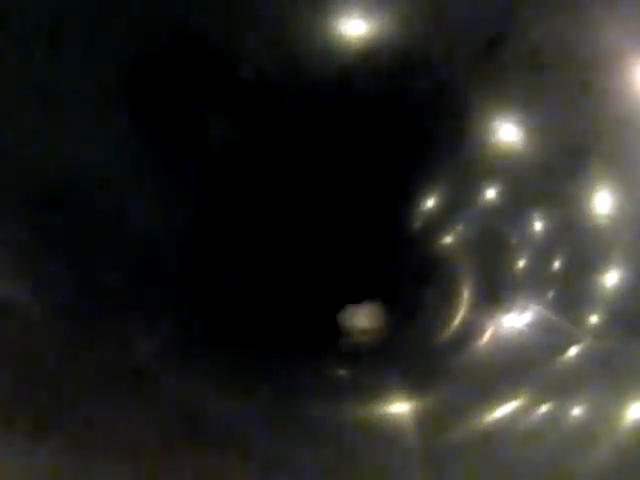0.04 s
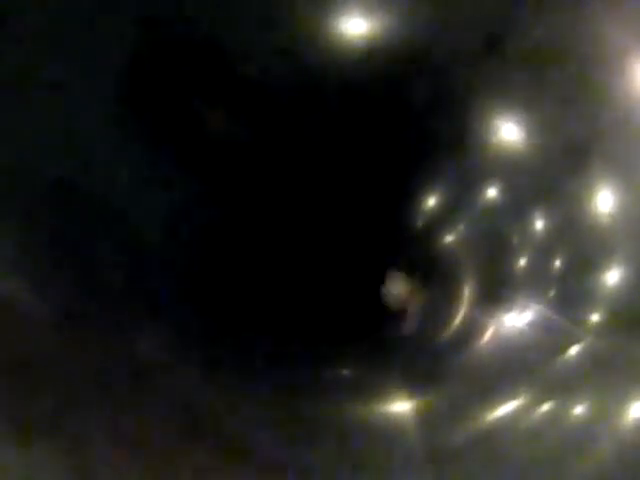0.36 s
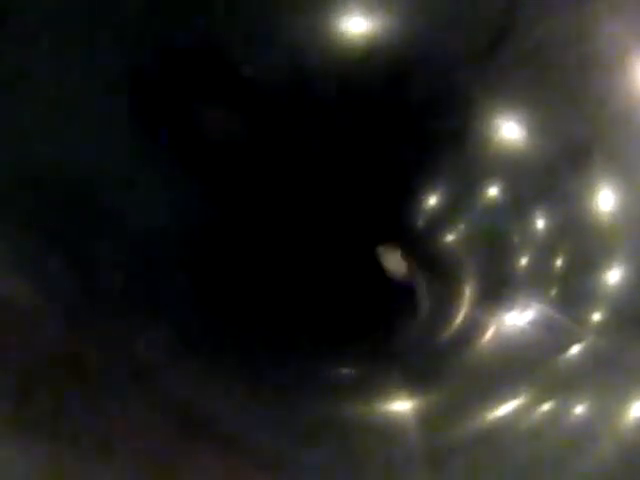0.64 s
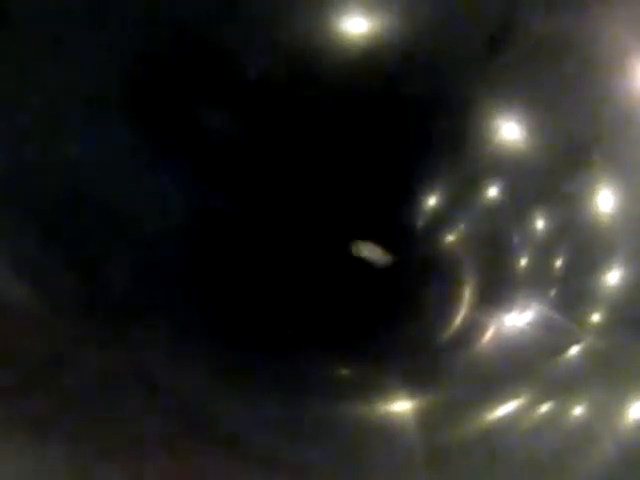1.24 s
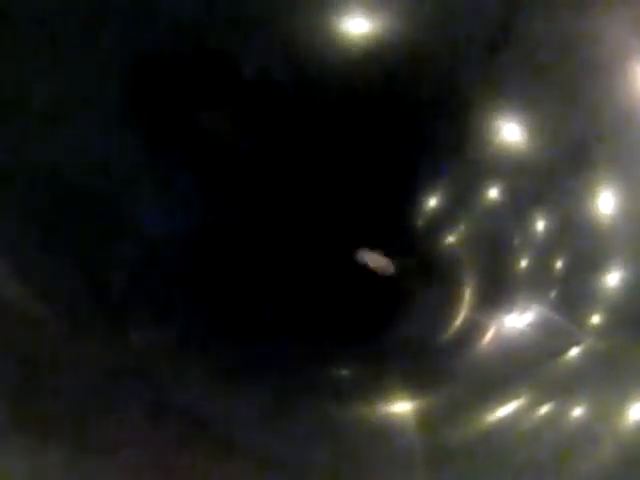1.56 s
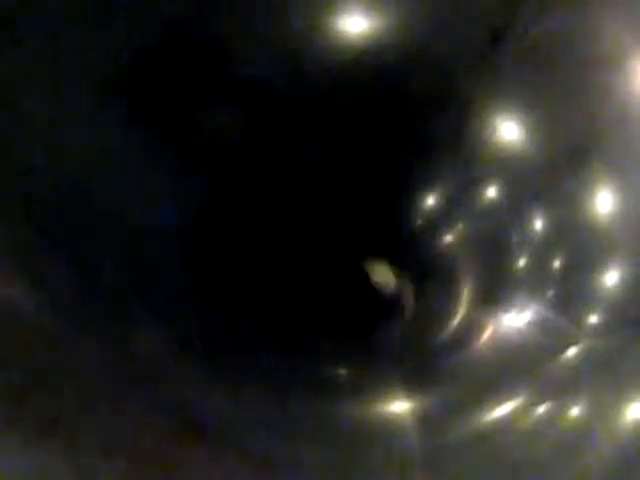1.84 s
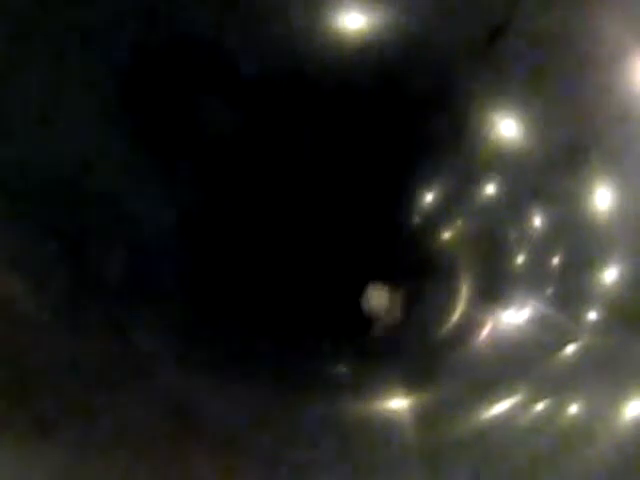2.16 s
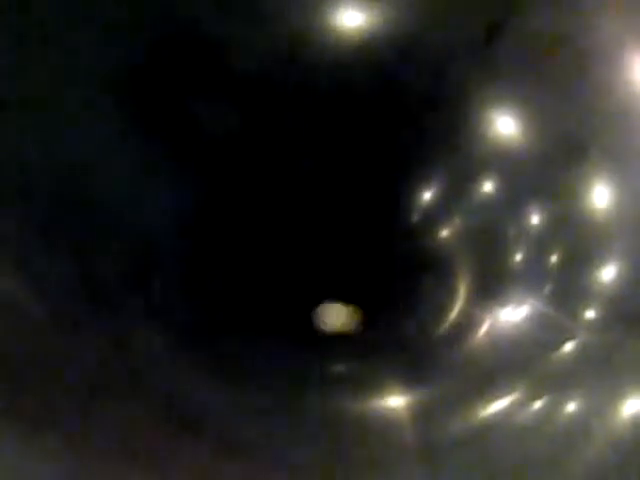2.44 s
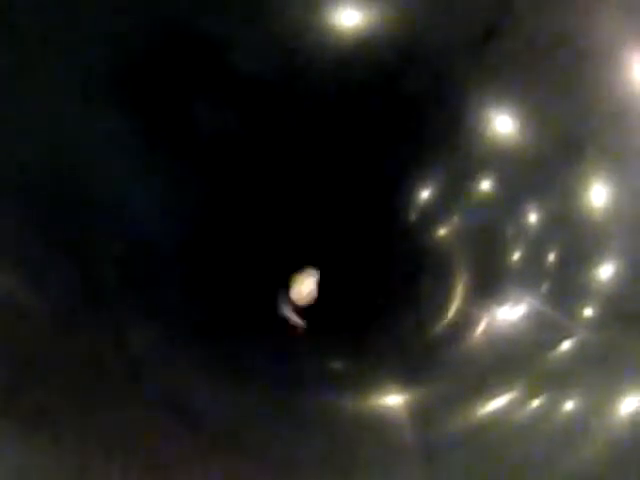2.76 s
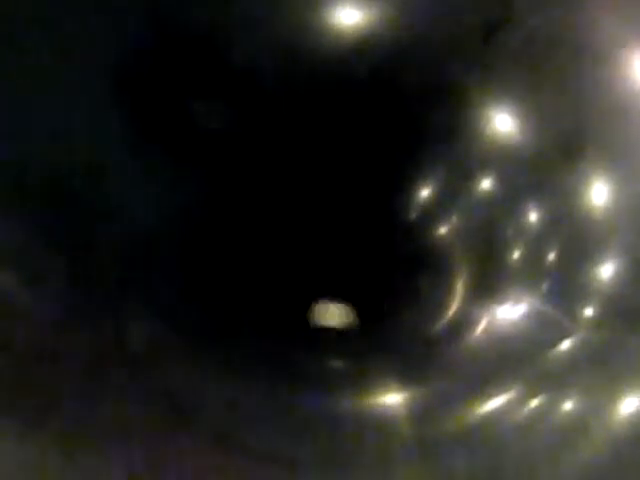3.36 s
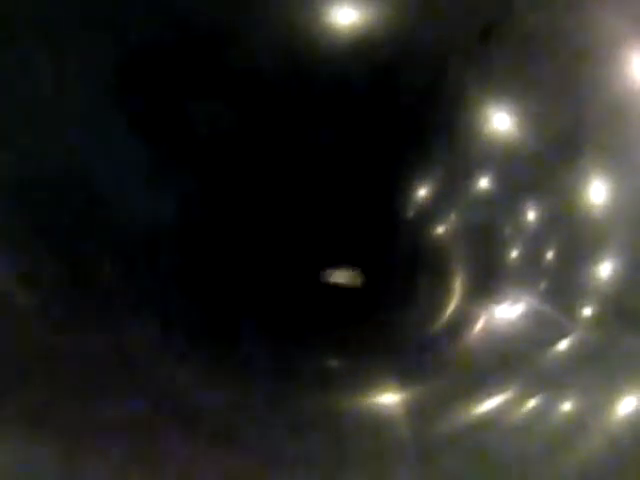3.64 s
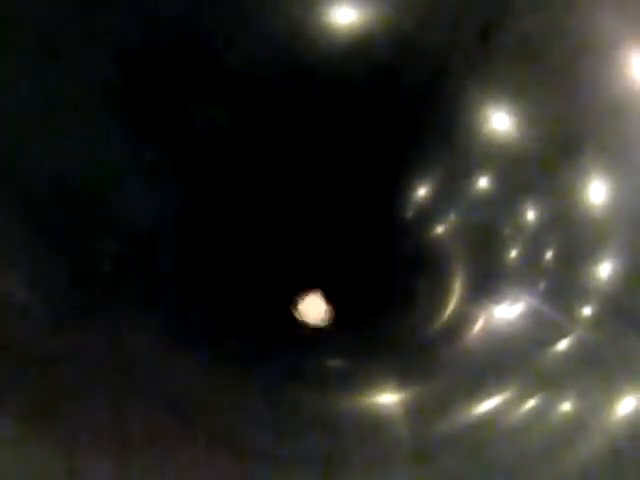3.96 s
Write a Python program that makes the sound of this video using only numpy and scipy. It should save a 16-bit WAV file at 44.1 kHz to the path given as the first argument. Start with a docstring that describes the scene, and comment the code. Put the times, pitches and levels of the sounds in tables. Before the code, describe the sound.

Steady close hiss of a coin rolling rapidly around the throat of a funnel.

```python
"""A steady rushing hiss, close up: a small coin circling fast on its edge, deep in the throat of a
funnel-shaped well. Its rim strikes thousands of tiny bumps a second, which merge into the hiss and
keep the funnel wall ringing; one resonance sings out now and then as a faint note.
One close microphone, with a faint low rumble of the room behind."""
import sys
import numpy as np
from scipy import signal
from scipy.fft import rfft, irfft
from scipy.io import wavfile
from scipy.ndimage import uniform_filter1d

SR = 44100
rng = np.random.default_rng(int(sys.argv[2]) if len(sys.argv) > 2 else 0)


def waveform_to_disk(signal):
    """Save audio, clipped to [-1, 1], as 16-bit WAV at the path in sys.argv[1]."""
    frames = np.transpose(np.atleast_2d(signal))
    scaled = np.clip(frames, -1, 1) * 32767
    samples = np.round(scaled).astype(np.int16)
    wavfile.write(sys.argv[1], SR, samples)


N = 176400
TIME = np.arange(N) / SR
HZ = np.fft.rfftfreq(2 * N, 1 / SR)

# Small swells of the hiss as the coin goes round: time_s, body_gain_db, treble_gain_db
HISS_SWELLS = [(0.0, -0.5, 0.9), (0.38, -0.4, 0.9), (0.61, -0.9, 0.3), (0.67, -0.5, 2), (0.73, -0.4, -1),
               (0.87, 0, 1.5), (0.93, -1, -0.8), (1.04, 0.4, 0.8), (1.1, -0.5, -0.5), (1.36, 0.1, -0.2),
               (1.42, -1.4, -0.5), (1.51, 1, -0.4), (1.65, -1, 1), (1.74, -0.8, 0), (1.89, 0.8, 1.5),
               (1.97, 0.5, -0.7), (2.09, -1, -0.4), (2.41, -0.5, 1.1), (2.64, 0.1, -0.7), (2.96, -0.5, 0.4),
               (3.28, 0, 0), (3.31, 0.7, 1), (3.48, -0.2, -0.4), (3.77, 0.1, -1.3), (3.86, 0, 1),
               (4.0, -0.2, -1.2)]
# Broad colour of the coin on the wall, from close by: frequency_hz, gain_db
WALL_COLOUR = [(60, -37), (150, -28.5), (200, -18.5), (330, -15.5), (450, -10), (620, -1.5), (1200, -1.7),
               (1700, -1.07), (2150, 0.0), (2800, -1.65), (4000, -2.0), (5200, -1.5), (6700, -3.5),
               (7600, -6), (10000, -11), (12000, -15.5), (14000, -23), (15700, -27.5)]
# Funnel resonances that stand out of that colour: pitch_hz, width_hz, gain_db
FUNNEL_MODES = [(671, 16, 4), (700, 20, 4.2), (885, 18, 3), (1152, 26, 3.5), (1228, 30, 3.5), (1507, 13, 3),
                (1862, 26, 2.5), (2131, 22, 3.5), (2273, 13, 4), (2672, 24, 2.5), (2923, 20, 3.5),
                (3452, 36, 3), (4964, 26, 3), (5473, 22, 3)]
# Bands where the funnel radiates weakly: centre_hz, width_hz, gain_db
FUNNEL_HOLLOWS = [(583, 25, -3.5), (767, 150, -3.5), (1085, 30, -3.5), (1705, 70, -3), (2740, 50, -2)]
# Rise and fall of the one singing resonance: time_s, level_db
SINGING_LEVELS = [(0, -42), (1.2, -41), (2.0, -45), (2.42, -40), (3.15, -44), (3.22, -34), (3.37, -35),
                  (3.46, -42), (4, -42)]
# Colour of the room tone: frequency_hz, gain_db
RUMBLE_COLOUR = [(10, -19), (30, -4.5), (45, -2.5), (75, -12), (100, -1.5), (140, -6), (250, -28),
                 (1000, -40)]


def rolling_coin(impacts, level_db=-18, split_hz=5500):
    """The rim's impacts heard through the funnel; body and treble swell a little as the coin circles."""
    time_s, body_db, treble_db = np.transpose(HISS_SWELLS)
    funnel = funnel_response()
    lowpass = 1 / (1 + (HZ / split_hz) ** 4)
    body = filtered(impacts, funnel * lowpass) * amp(np.interp(TIME, time_s, body_db))
    treble = filtered(impacts, funnel * (1 - lowpass)) * amp(np.interp(TIME, time_s, treble_db))
    return amp(level_db) * unit_rms(body + treble)


def rim_impacts(bumps_per_s=16000, spread_db=2, judder_db=0.31, judder_hz=25):
    """The rim strikes dense tiny bumps of uneven strength, under a slightly juddering contact force."""
    hits = rng.random(2 * N) < bumps_per_s / SR
    strength = amp(spread_db * rng.standard_normal(2 * N)) * rng.choice([-1, 1], 2 * N)
    judder = unit_rms(irfft(rfft(rng.standard_normal(2 * N)) / (1 + (HZ / judder_hz) ** 2)))
    return hits * strength * amp(judder_db * judder)


def coin_travel(impacts, shimmer_db=1.75, patch_s=0.08, patch_hz=45, half_depth_hz=700):
    """Moving along the wall, the coin feeds now these modes, now those: a random shimmer."""
    frames = dict(fs=SR, nperseg=2048, noverlap=1536)
    hz, time_s, spectra = signal.stft(impacts, **frames)
    patches = rng.standard_normal(spectra.shape[::-1])
    for axis, span in enumerate([patch_s / time_s[1], patch_hz / hz[1]]):
        patches = uniform_filter1d(patches, max(round(span), 1), axis)
    depth_db = shimmer_db * hz / (hz + half_depth_hz)  # shallower in the bass
    gain = amp(depth_db * unit_rms(patches))
    gain /= amp(np.log(10) / 20 * depth_db ** 2)  # keeps the mean power
    return signal.istft(spectra * gain.T, **frames)[1][:len(impacts)]


def funnel_response(ring_s=0.024, ripple_db=1.1, ripple_half_hz=9000):
    """The wall's gain by frequency: broad colour, resonances, hollows and a ripple of many weak modes."""
    gain_db = along_hz(WALL_COLOUR)
    for centre_hz, width_hz, peak_db in FUNNEL_MODES + FUNNEL_HOLLOWS:
        gain_db += peak_db / (1 + (2 * (HZ - centre_hz) / width_hz) ** 2)
    age_squared = (TIME / ring_s) ** 2
    weak_ringing = rng.standard_normal(N) * age_squared * np.exp(-age_squared)
    ripple = unit_rms(rfft(weak_ringing, 2 * N).real)
    return amp(gain_db + ripple_db * ripple / (1 + (HZ / ripple_half_hz) ** 2))


def singing_mode(impacts, pitch_hz=1007, width_hz=7, evenness=0.95):
    """The rim keeps one narrow resonance of the funnel sounding, as a faint wavering note."""
    resonance = 1 / (1 + 1j * (HZ - pitch_hz) / width_hz) ** 2
    ring = signal.hilbert(filtered(impacts, resonance))
    note = ring.real / (abs(ring) + 1e-12) ** evenness  # flattens most of the chance swells
    return unit_rms(note) * amp(np.interp(TIME, *np.transpose(SINGING_LEVELS)))


def room_rumble(level_db=-61.5):
    """Room tone: steady low noise, far below the coin in level."""
    rumble = filtered(rng.standard_normal(2 * N), amp(along_hz(RUMBLE_COLOUR)))
    return amp(level_db) * unit_rms(rumble)


def amp(db):
    """Decibels to gain."""
    return 10 ** (np.asarray(db) / 20)


def unit_rms(x):
    """Scales to an rms of 1."""
    return x / np.sqrt(np.mean(x ** 2) + 1e-20)


def along_hz(points):
    """Reads a table of frequency_hz, gain_db on a log-frequency axis."""
    hz, gain_db = np.transpose(points)
    return np.interp(np.log(HZ + 1), np.log(hz + 1), gain_db)


def filtered(x, gain):
    """Filters a double-length signal and keeps its settled middle."""
    return irfft(rfft(x) * gain)[N // 2:][:N]


def scene():
    """Coin, funnel and room at one close microphone, alike in both channels."""
    hiss = rolling_coin(coin_travel(rim_impacts()))
    mono = hiss + singing_mode(rim_impacts()) + room_rumble()
    return np.array([mono, mono])


def record(dry):
    """The recorder cuts the treble steeply at its band limit."""
    band_limit_hz = 15850
    lowpass = signal.firwin(511, band_limit_hz, window=("kaiser", 9), fs=SR)
    return signal.oaconvolve(dry, lowpass[None], "same")


dry = scene()
out = record(dry)
waveform_to_disk(out)
```